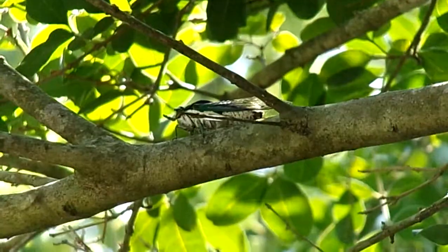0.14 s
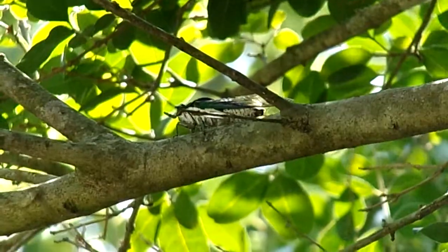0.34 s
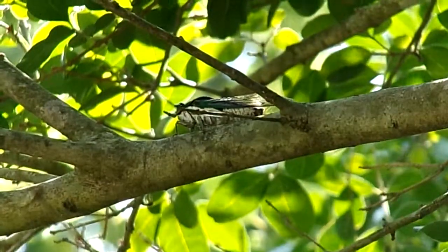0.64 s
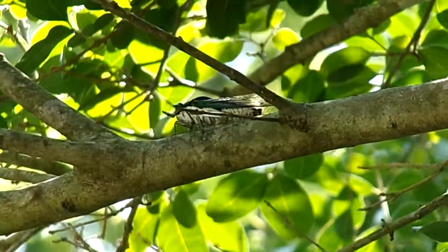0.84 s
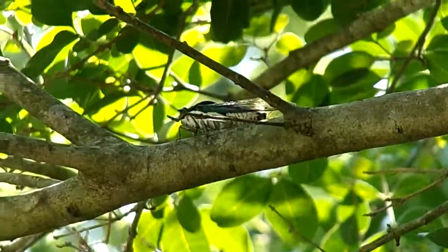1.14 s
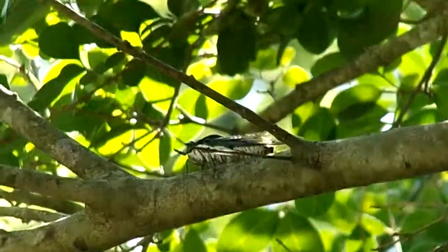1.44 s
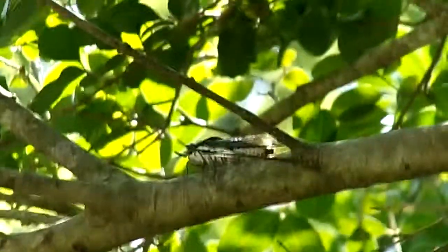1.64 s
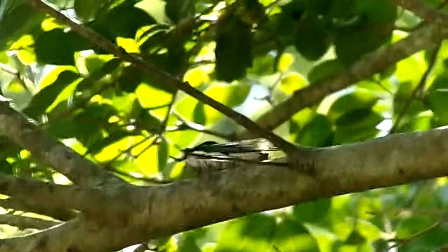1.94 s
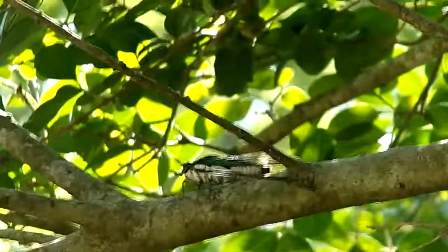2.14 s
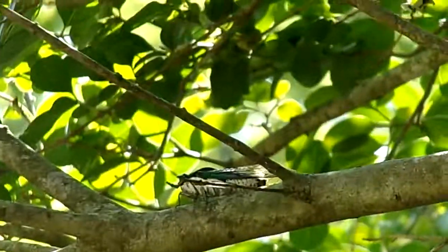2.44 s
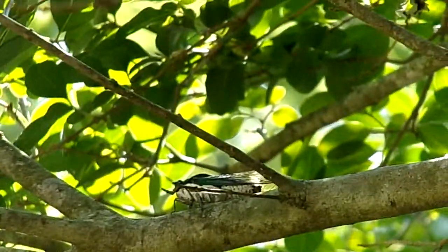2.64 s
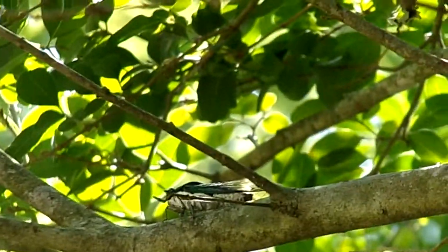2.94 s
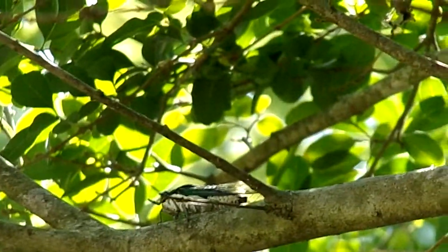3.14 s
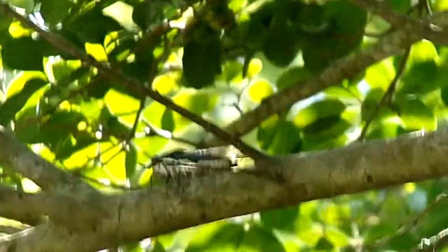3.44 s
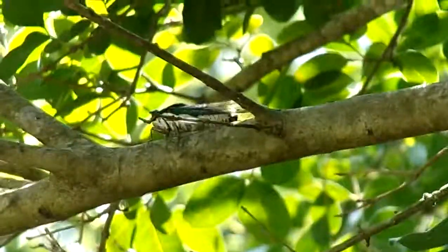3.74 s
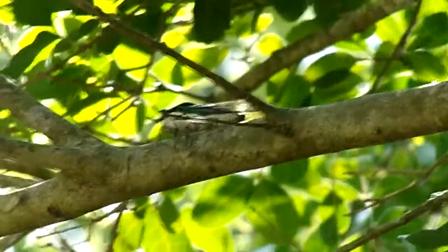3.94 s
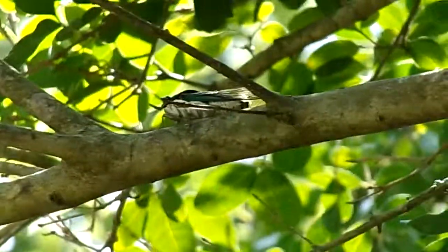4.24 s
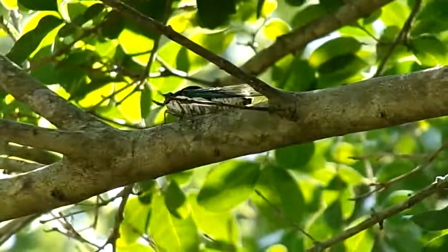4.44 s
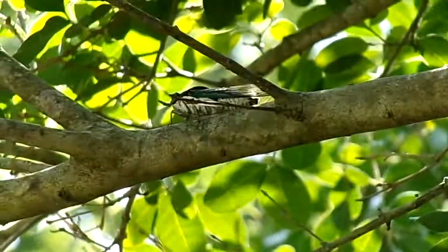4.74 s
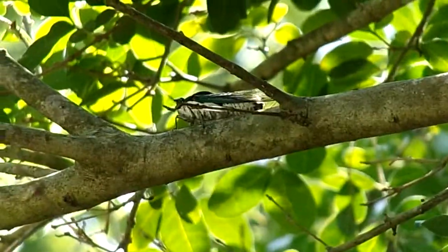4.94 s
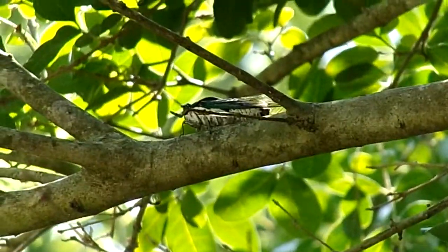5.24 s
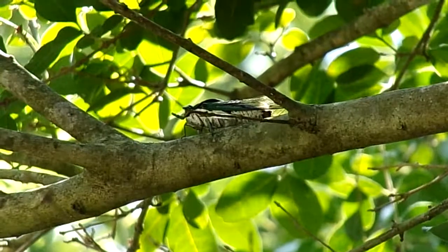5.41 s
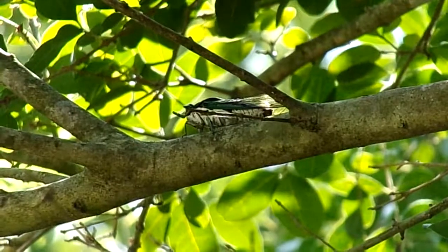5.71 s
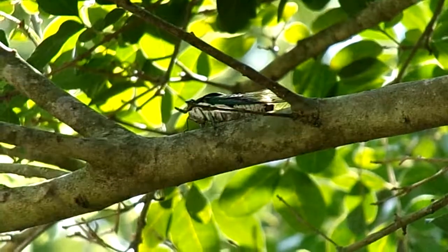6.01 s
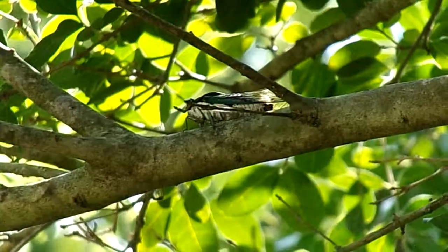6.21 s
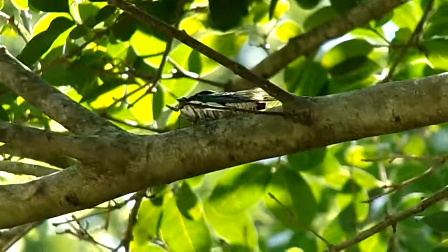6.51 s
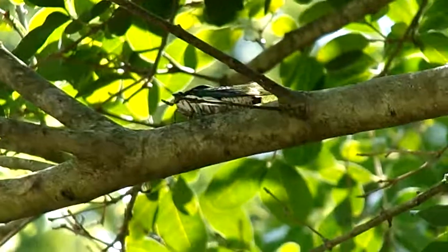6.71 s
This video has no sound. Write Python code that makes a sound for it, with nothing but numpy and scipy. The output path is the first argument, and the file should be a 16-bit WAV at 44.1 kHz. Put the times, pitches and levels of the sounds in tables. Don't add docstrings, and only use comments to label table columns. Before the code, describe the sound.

A cicada's harsh, high buzz throbs fast on a branch, then fades into a steady hissing chorus of distant cicadas and chirping bush crickets.

```python
import sys
import numpy as np
from scipy import signal
from scipy.fft import rfft, irfft, next_fast_len
from scipy.io import wavfile
from scipy.ndimage import map_coordinates

SR = 44100
rng = np.random.default_rng(int(sys.argv[2]) if len(sys.argv) > 2 else 0)


def store_pcm(level_fs):
    pcm = np.round(np.clip(level_fs, -1, 1) * 32767).astype(np.int16)
    wavfile.write(sys.argv[1], SR, np.atleast_2d(pcm).T)


def how_loud(loudness_db):
    steps = np.asarray(loudness_db, float) / 20
    return 10 ** steps


N = 302967

# f/Hz, density/(dB per Hz)
ROAD_SPECTRUM = [(12, -51), (20, -23.5), (125, -1.5), (216, 1), (561, -7.5), (705, -7.5), (806, -10.5),
                 (904, -8), (1430, -12), (1660, -16.5), (1900, -8.5), (2470, -36), (4180, -120)]
# t/s, length/s, extra level/dB
DRONE_SWELLS = [
    [(0, .4, 5), (.6, .5, 3), (1.25, 0.77, 4), (2, 1, 3), (2.85, .4, 4), (3.48, 0.56, 7), (4.05, 0.75, 6),
     (4.6, .6, 3), (5, .4, 5), (5.5, 0.62, 6), (5.95, .5, 6), (6.7, .7, 5)],
    [(1.35, .8, 4), (2.4, .7, 3), (3.3, .7, 4), (3.95, .6, 6), (4.8, 0.56, 5.5), (5.95, .7, 8),
     (6.5, .9, 6.6)],
]
# t/s, length/s, extra level/dB
WHINE_SWELLS = [(1.3, .4, 13), (1.8, .9, 7), (2.68, .4, 14), (3.23, .4, 8), (3.9, 0.97, 15), (4.75, .5, 10),
                (6.3, .5, 14), (6.55, .4, 12), (6.87, .4, 10)]
# t/s, near singer level/dB, far chorus level/dB
SONG_LEVELS = [(0, -44.5, -39.5), (0.8, -44.5, -39.5), (1.6, -45, -40), (2.05, -47, -40), (2.3, -49, -41),
               (2.6, -50.5, -40), (2.85, -52.5, -40.5), (3.2, -55, -41.5), (3.9, -55.5, -42.5),
               (4.45, -56.5, -44.5), (4.72, -57.5, -43.5), (5.15, -58, -46.5), (5.6, -59, -46),
               (6.2, -57, -45.8), (6.4, -58, -47.5), (6.87, -56.5, -45.5)]
# t/s, level/dB
DEEP_LEVELS = [(0, -45.5), (2, -45.5), (3.1, -46.5), (3.55, -45.5), (4.1, -47.5), (5.3, -48), (6.87, -48)]
# f/Hz, density/(dB per Hz)
CHORUS_SPECTRUM = [(2500, -56), (3400, -8), (4000, -2), (4500, -0.5), (5300, -4.5), (6000, -11),
                   (7400, -15.5), (8300, -33), (9200, -23), (11000, -32.5), (12500, -48)]
DEEP_SPECTRUM = [(1500, -30), (1800, -23.5), (2100, -10.5), (2500, -4), (3100, 0), (3600, -2), (4300, -4),
                 (5000, -31)]
HISS_SPECTRUM = [(7800, -30), (8300, 1.5), (10500, -0.5), (13000, -2.5), (14000, -5.5), (15750, -7)]
BUZZ_SPECTRUM = [(1700, -46), (2300, -13.5), (2900, -5), (3500, -3.5), (4300, -3), (5400, -0.5),
                 (6000, -11), (6400, -5), (7300, -1.5), (7750, -11), (8300, -19.5), (11000, -30),
                 (13000, -40), (15750, -47.5)]
# f/Hz, width/Hz, level/dB
ECHO_PEAKS = [(2891, 40, -6), (3397, 30, -5), (4025, 40, -7), (4577, 25, -3), (4828, 20, -9),
              (5337, 25, -12), (6437, 22, 0), (6801, 20, -5), (7050, 25, -8)]
# t/s, slow level/dB, fast level/dB, high level/dB
CRICKET_LEVELS = [(0, -66, -72, -70), (1.1, -63.5, -66, -70), (1.85, -70, -70, -70), (2.3, -66, -67, -70),
                  (3.1, -68, -63, -69), (3.87, -62, -67, -68), (4.3, -65, -65, -67),
                  (4.8, -63.5, -66, -66.5), (5.1, -63, -62, -66), (5.8, -63, -66, -68),
                  (6.3, -61, -66, -67), (6.6, -64, -65, -63), (6.87, -61, -66, -66)]
# t/s, chirps so far
SLOW_COUNT = [(.155, 0), (.959, 4), (1.341, 6), (1.876, 9), (2.243, 11), (3.024, 15), (3.453, 17),
              (3.873, 19), (4.31, 21), (4.53, 22), (5.25, 26), (5.425, 27), (6.04, 30), (6.815, 34)]
FAST_COUNT = [(.069, 0), (1.481, 9), (1.938, 12), (3.311, 21), (3.754, 24), (4.532, 29), (4.973, 32),
              (5.757, 37), (6.389, 41), (6.845, 44)]
HIGH_COUNT = [(2.279, 0), (2.853, 3), (3.854, 8), (4.482, 11), (5.65, 17), (5.91, 18), (6.25, 20),
              (6.43, 21), (6.815, 23)]
# t/s, level/dB
STRAY_CHIRPS = [(3.525, -72), (4, -71), (4.98, -69), (6.16, -64), (6.32, -66)]
# t/s, level/dB
RATTLE_LEVELS = [(0, -74), (4.8, -65), (5.3, -54), (5.6, -55), (5.8, -50), (6, -48.5), (6.2, -47.5),
                 (6.27, -54), (6.4, -70), (6.6, -62), (6.87, -46)]
# f/Hz, width/Hz, level/dB
RATTLE_BODY = [(4120, 300, -1), (4520, 400, 0), (4900, 300, -4)]
# t/s, peak level/dB
TWIG_TICKS = [
    (2.7344, -54),
    (6.1994, -56),
]
# t/s, throbs so far
THROB_COUNT = [(-.0055, -1), (1.759, 23), (2.03, 26), (2.1, 27), (2.2, 29), (6.87, 92.5)]
# f/Hz, place from the beat/throbs, length/s, level/dB
FIRST_STROKE = [(5345, -.27, .03, -7), (4830, -.2, .03, -13), (4580, -.11, .036, -7.5), (4268, 0, .046, -1),
                (6437, .05, .06, -17), (2892, .1, .05, -10)]
SECOND_STROKE = [(4925, .02, .03, -8), (4600, .2, .032, -2), (4282, .27, .036, -1), (4090, .3, .032, -6),
                 (4675, -.3, .03, -7)]
# t/s, extra level/dB of the first stroke
STRESSED_THROBS = [(.068, 0), (.215, 3), (.289, 3.5), (.362, -3), (.436, 2), (.583, -2), (.656, 4),
                   (.73, 2.5), (.877, -3), (.95, 3), (1.024, 5), (1.097, -4), (1.171, 6.5), (1.244, -3),
                   (1.392, 3), (1.686, 2), (1.85, 3), (1.94, -5), (2.03, 8.5), (2.1, 5), (2.15, 6),
                   (2.27, -5), (2.35, 3), (2.42, -4), (2.57, 4), (2.64, 7.5), (2.86, 7), (2.94, 7)]
# t/s, length/s, extra level/dB
SECOND_SWELLS = [(.07, 0.22, 7), (.8, .3, 3), (1.02, .2, 7), (1.45, .8, 7), (2.1, .2, 6), (2.4, .4, 9),
                 (2.78, .5, 14), (3.8, 1.6, 14)]
# f/Hz, width/Hz, depth/dB
CAMERA_NOTCHES = [(3698, 200, -32), (7890, 300, -22), (8084, 300, -26), (11722, 400, -32)]

THROB_HZ = 13.6


def unit(x):
    return x / np.sqrt(np.mean(x ** 2) + 1e-20)


def curves(rows):
    s, *cols = np.transpose(rows)
    return [np.interp(np.arange(N) / SR, s, c) for c in cols]


def wobble(rate):
    knots = rng.standard_normal(int(N * rate / SR) + 4)
    return map_coordinates(knots, [np.arange(N) * rate / SR])


def swells(rows):
    t = np.arange(N) / SR
    bumps = [db * np.cos(np.pi * np.clip((t - s) / length, -.5, .5)) for s, length, db in rows]
    return np.max(bumps, axis=0)


def filtered(x, response):
    m = next_fast_len(N + SR // 2, True)
    return irfft(rfft(x, m) * response(np.fft.rfftfreq(m, 1 / SR)), m)[..., :N]


def colour(points):
    f, db = np.transpose(points)
    return lambda hz: how_loud(np.interp(np.log(hz + 1), np.log(f), db, -120, -120))


def modes(rows):
    def response(f):
        total = 0
        for k, (centre, width, db) in enumerate(rows):
            damping = 1j * f * width
            total = total + (-1) ** k * how_loud(db) * damping / (centre ** 2 - f ** 2 + damping)
        return total
    return response


def narrow(hz, width_hz):
    resonance = modes([(hz, width_hz, 0)])
    return unit(filtered(rng.standard_normal(N), lambda f: resonance(f) ** 2))


def gated(rate_hz, depth_db):
    turn = 2 * np.pi * np.cumsum(np.broadcast_to(rate_hz, N)) / SR
    return how_loud(depth_db * np.cos(turn)) * rng.standard_normal(N)


def branches(x, t60, level_db):
    t = np.arange(round(t60 * SR)) / SR
    echoes = rng.standard_normal(len(t)) * how_loud(-60 * t / t60) * (t > .0015)
    echoes *= how_loud(level_db) / np.linalg.norm(echoes)
    echoes[0] = 1
    return signal.fftconvolve(x, echoes)[:N]


def traffic():
    rumble = how_loud(-59 + 0.5 * wobble(2.11)) * unit(filtered(rng.standard_normal(N), colour(ROAD_SPECTRUM)))
    lower = how_loud(-74 + swells(DRONE_SWELLS[0])) * narrow(711, 95)
    upper = how_loud(-76 + swells(DRONE_SWELLS[1])) * narrow(915, 60)
    whine = how_loud(-85.5 + swells(WHINE_SWELLS)) * narrow(1542, 71)
    return rumble + lower + upper + whine


def far_chorus():
    def crowd(spectrum):
        noise = branches(rng.standard_normal(N), t60=0.22, level_db=-12)
        return unit(filtered(noise, colour(spectrum)))

    chorus_db = curves(SONG_LEVELS)[1]
    hiss = how_loud(-63.6 + 2.4 * (chorus_db + 40))
    hiss = np.hypot(hiss, how_loud(-67.5))
    hiss = np.hypot(hiss, how_loud(curves(RATTLE_LEVELS)[0] - 21))
    chorus = how_loud(chorus_db - 1 + 0.31 * wobble(14)) * crowd(CHORUS_SPECTRUM)
    deep = how_loud(curves(DEEP_LEVELS)[0] + 0.55 * wobble(8)) * crowd(DEEP_SPECTRUM)
    return chorus + deep + hiss * crowd(HISS_SPECTRUM)


def steady(rows, level_db):
    s, count = np.transpose(rows)
    moments = np.interp(np.arange(count[-1] + 1), count, s)
    return np.transpose([moments, level_db[(moments * SR).astype(int)]])


def shaped(moments, length, start_hz, end_hz):
    chirps = []
    for s, db in moments:
        a, b, c = rng.standard_normal(3)
        chirps.append((s - length / 2, length, db + 0.4 * a, start_hz + 50 * b, end_hz + 50 * c))
    return chirps


def cricket(chirps, stroke_hz, gain_db):
    edge, width_hz = .012, 260
    t, level, hz = np.arange(N) / SR, np.zeros(N), np.full(N, chirps[0][3] + 0.)
    for s, length, db, start_hz, end_hz in chirps:
        span = slice(max(round((s - edge) * SR), 0), round((s + length + edge) * SR))
        u = t[span] - s
        fade = np.clip(np.minimum(u, length - u) / (2 * edge) + .5, 0, 1)
        level[span] += how_loud(db + gain_db) * fade
        hz[span] = start_hz + (end_hz - start_hz) * u / length
    strokes = gated(stroke_hz + 3 * wobble(5), depth_db=5) + 1j * rng.standard_normal(N) * .6
    soften = signal.butter(2, width_hz / 2, fs=SR, output="sos")
    carrier = np.exp(2j * np.pi * np.cumsum(hz) / SR)
    return level * unit((signal.sosfilt(soften, strokes) * carrier).real)


def bush_crickets():
    slow_db, fast_db, high_db = curves(CRICKET_LEVELS)
    slow_chirps = shaped(steady(SLOW_COUNT, slow_db), length=.085, start_hz=9310, end_hz=9150)
    fast_chirps = shaped(steady(FAST_COUNT, fast_db), length=.06, start_hz=9180, end_hz=9240)
    high_chirps = shaped(steady(HIGH_COUNT, high_db), length=.095, start_hz=9950, end_hz=9720)
    high_chirps += shaped(STRAY_CHIRPS, length=.055, start_hz=9750, end_hz=9750)
    slow = cricket(slow_chirps, stroke_hz=112, gain_db=.5)
    fast = cricket(fast_chirps, stroke_hz=108, gain_db=.5)
    return slow + fast + cricket(high_chirps, stroke_hz=121, gain_db=-1.5)


def twig_ticks():
    out, t = np.zeros(N), np.arange(SR // 50) / SR
    for s, db in TWIG_TICKS:
        out[round(s * SR):][:len(t)] = how_loud(db + 3 - 60 * t / .015) * rng.standard_normal(len(t))
    return filtered(out, lambda f: (1j * f / (7000 + 1j * f)) ** 2)


def neighbour():
    burst_hz, burst_start = 53.2, 5.783
    turn = 2 * np.pi * burst_hz * (np.arange(N) / SR - burst_start) + .12 * wobble(12)
    clicks = np.diff(np.floor(np.cumsum(300 + 45 * wobble(150)) / SR), prepend=0)
    bursts = how_loud(8 * np.cos(turn) + 2 * wobble(250)) * (clicks + .03 * rng.standard_normal(N))
    rattle = filtered(filtered(bursts, modes(RATTLE_BODY)), modes([(4900, 1500, 0)]))
    return how_loud(curves(RATTLE_LEVELS)[0]) * unit(rattle)


def rings(rows, beats, strokes_db, scatter_db, scatter_hz, scatter_s):
    out = np.zeros(N + SR)
    for hz, place, length, db in rows:
        t = np.arange(round(length * SR)) / SR
        swell = np.sin(np.pi * t / length) ** 2
        for beat, stroke_db in zip(beats, strokes_db):
            a, b, c = rng.standard_normal(3)
            start = max(round((beat + place / THROB_HZ + scatter_s * c - length / 2) * SR), 0)
            tone = np.sin(2 * np.pi * (hz + scatter_hz * b) * t) * swell
            out[start:][:len(t)] += how_loud(db + stroke_db + scatter_db * a) * tone
    return out[:N]


def drum(singer_db):
    s, count = np.transpose(THROB_COUNT)
    beats = np.interp(np.arange(count[0], count[-1]), count, s)
    at = np.clip(beats * SR, 0, N - 1).astype(int)
    uneven_db = .6 * rng.standard_normal((2, len(beats)))
    effort_db = 1.5 * (singer_db[at] + 45) + uneven_db
    for moment, db in STRESSED_THROBS:
        effort_db[0, np.argmin(abs(beats - moment))] += db
    first_db = -39 + effort_db[0]
    second_db = -45 + effort_db[1] + swells(SECOND_SWELLS)[at]
    first = rings(FIRST_STROKE, beats, first_db, scatter_db=.8, scatter_hz=10, scatter_s=.002)
    return first + rings(SECOND_STROKE, beats, second_db, scatter_db=1, scatter_hz=14, scatter_s=.003)


def cicada():
    singer_db = curves(SONG_LEVELS)[0]
    throb_db = .9 * np.cos(2 * np.pi * (curves(THROB_COUNT)[0] - .05))
    clicks = how_loud(throb_db) * gated(290 + 25 * wobble(7.3), depth_db=3.0)
    clicks = branches(clicks, t60=0.29, level_db=-3.0)
    body, peaks = colour(BUZZ_SPECTRUM), modes(ECHO_PEAKS)
    buzz = unit(filtered(clicks, lambda f: body(f) * (1 + abs(peaks(f)) * how_loud(3.0))))
    return how_loud(singer_db + 4.5) * buzz + drum(singer_db)


def scene():
    background = traffic() + far_chorus() + bush_crickets() + twig_ticks()
    mono = background + neighbour() + cicada()
    return np.array([mono, mono])


def low_pass(x):
    return signal.sosfilt(signal.butter(12, 16110, fs=SR, output="sos"), x)


def record(dry):
    def response(f):
        gain = f < 15750
        for centre, width, db in CAMERA_NOTCHES:
            stiffness, damping = centre ** 2 - f ** 2, 1j * f * width
            gain = gain * (stiffness + damping * how_loud(db)) / (stiffness + damping)
        return gain
    return low_pass(filtered(dry, response))


dry = scene()
out = record(dry)
store_pcm(out)
```